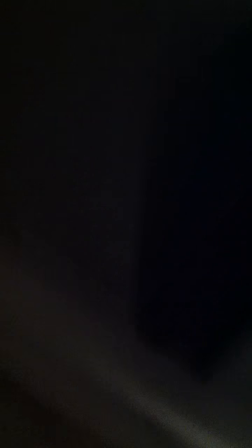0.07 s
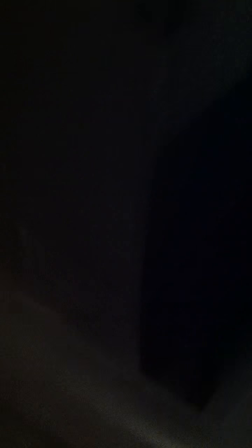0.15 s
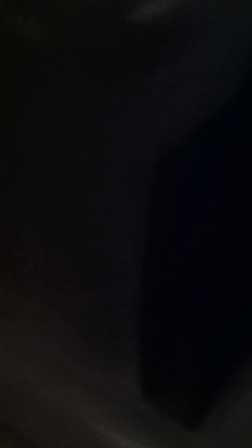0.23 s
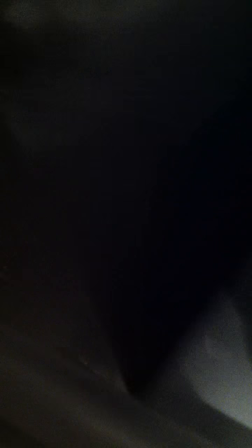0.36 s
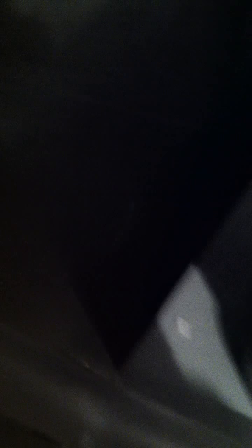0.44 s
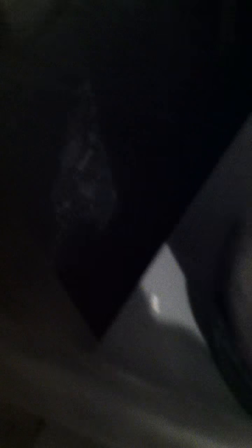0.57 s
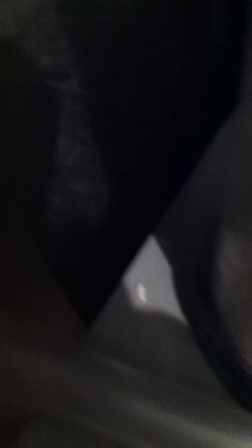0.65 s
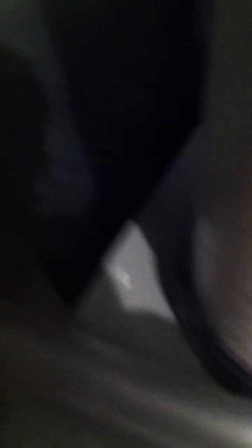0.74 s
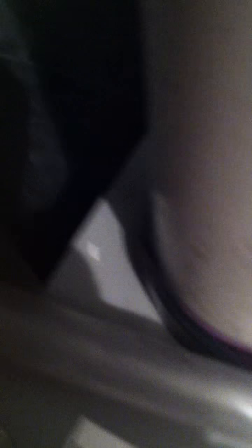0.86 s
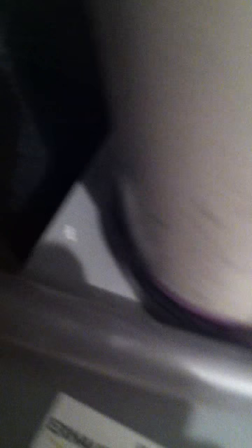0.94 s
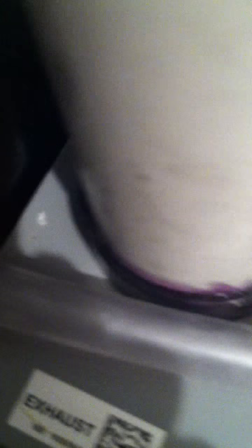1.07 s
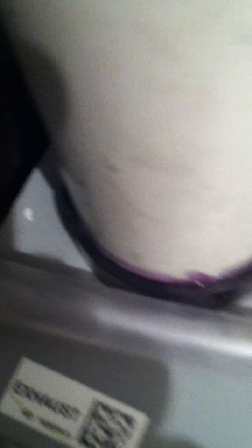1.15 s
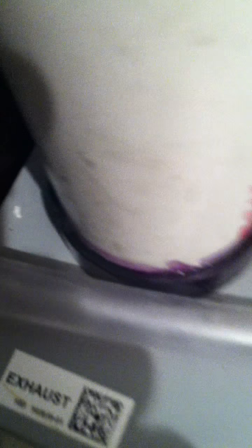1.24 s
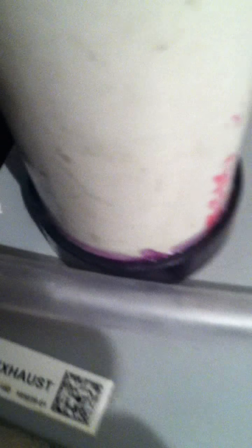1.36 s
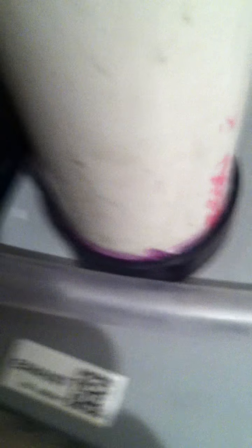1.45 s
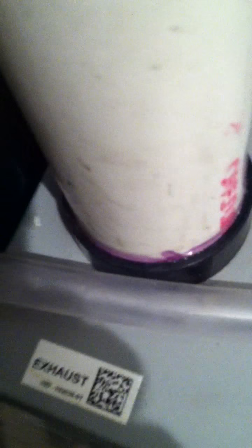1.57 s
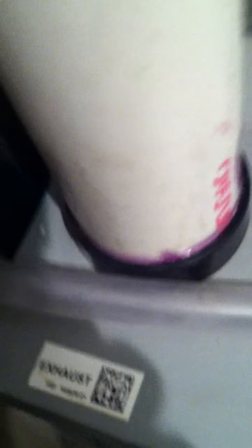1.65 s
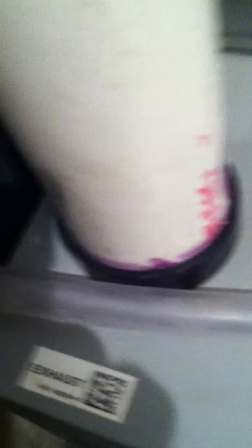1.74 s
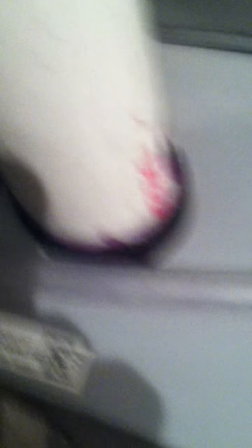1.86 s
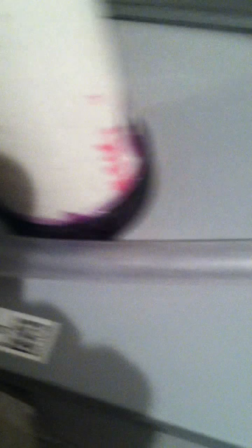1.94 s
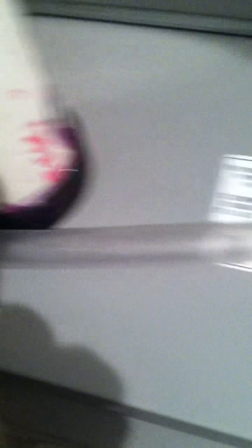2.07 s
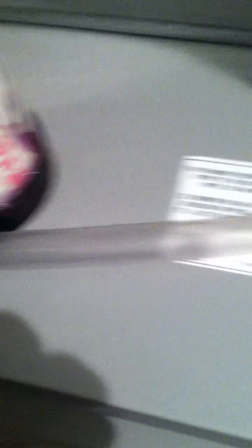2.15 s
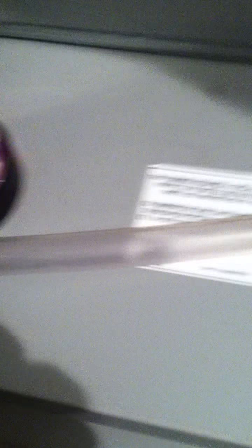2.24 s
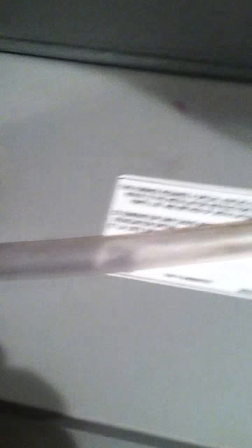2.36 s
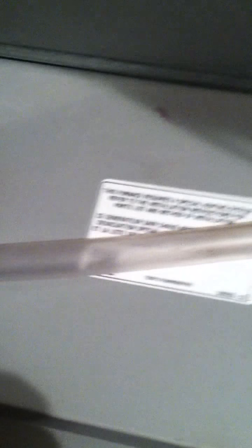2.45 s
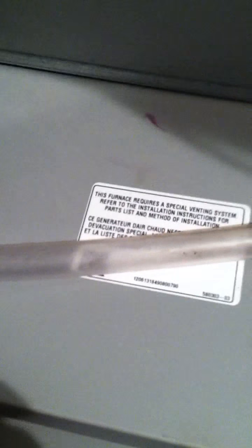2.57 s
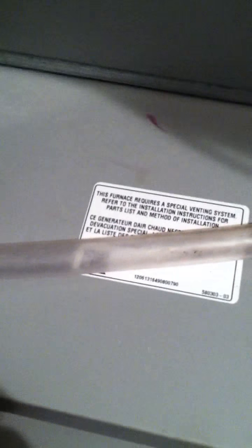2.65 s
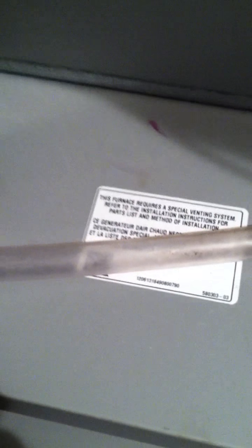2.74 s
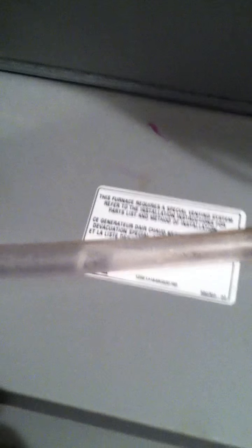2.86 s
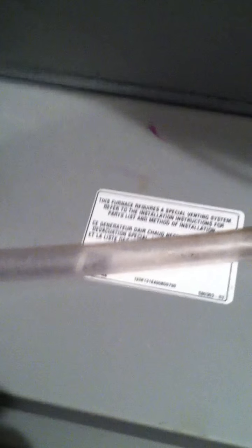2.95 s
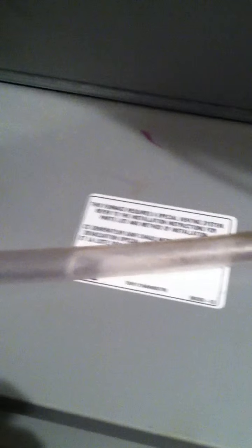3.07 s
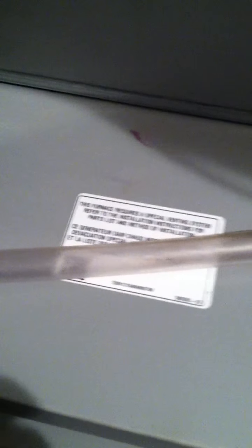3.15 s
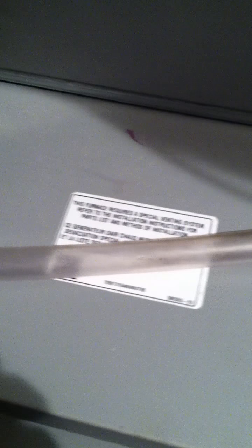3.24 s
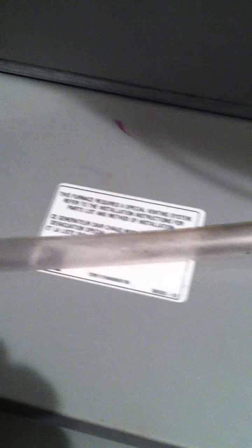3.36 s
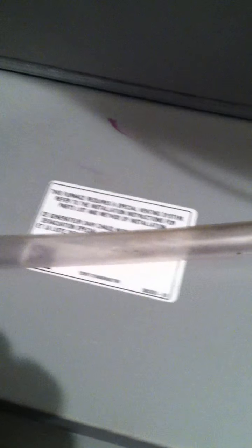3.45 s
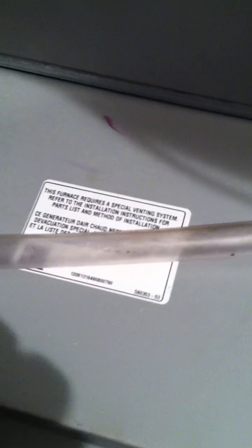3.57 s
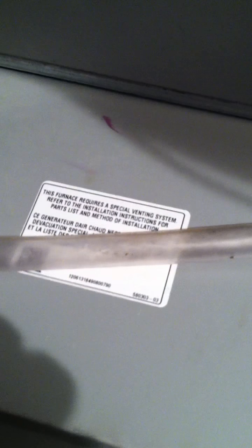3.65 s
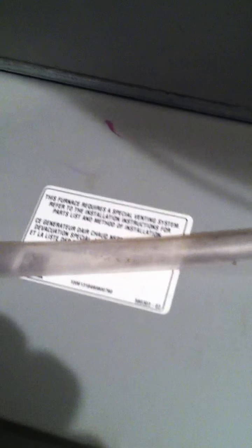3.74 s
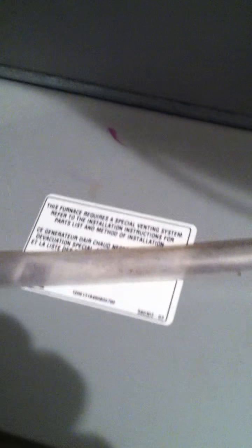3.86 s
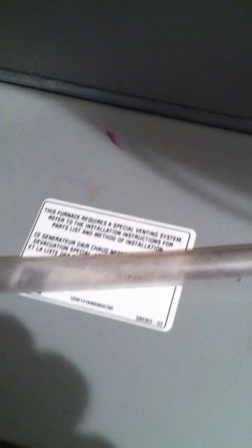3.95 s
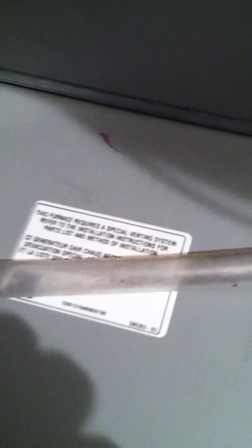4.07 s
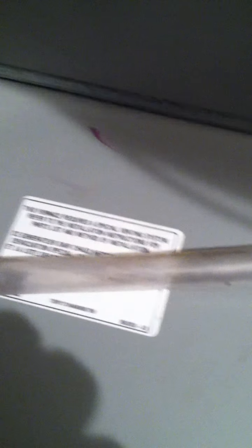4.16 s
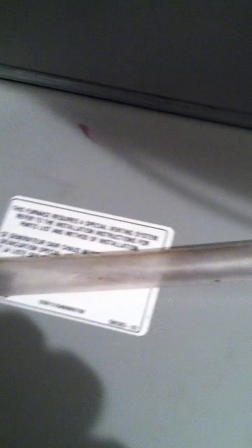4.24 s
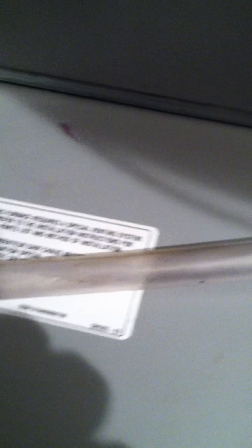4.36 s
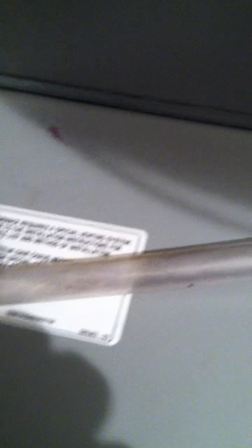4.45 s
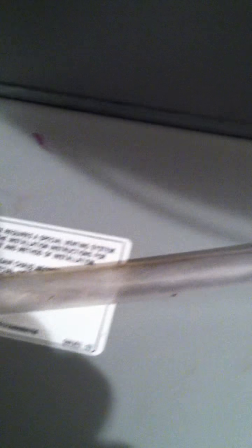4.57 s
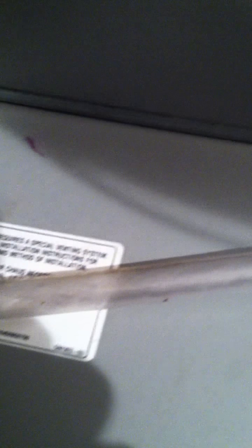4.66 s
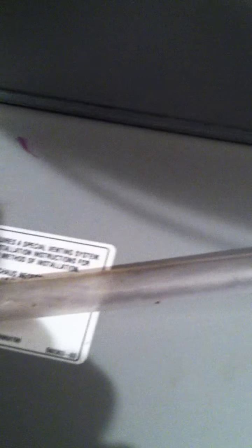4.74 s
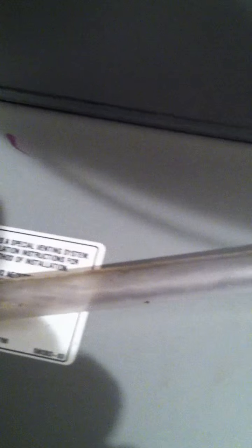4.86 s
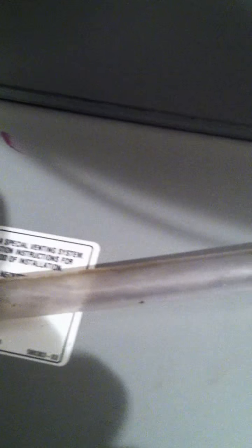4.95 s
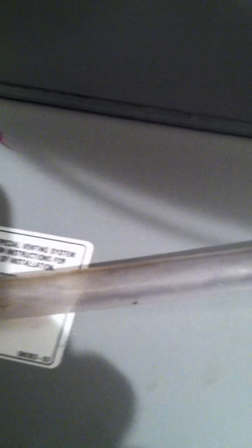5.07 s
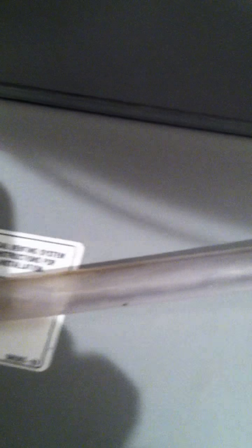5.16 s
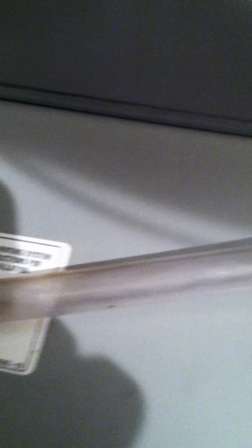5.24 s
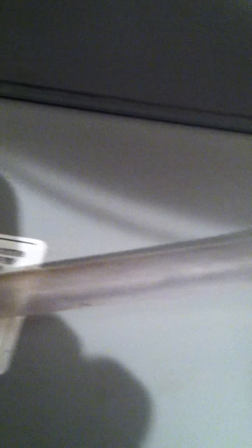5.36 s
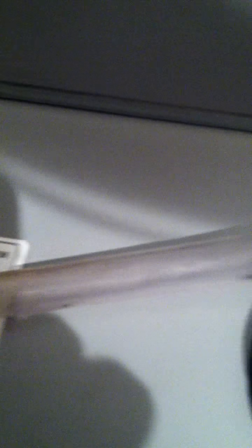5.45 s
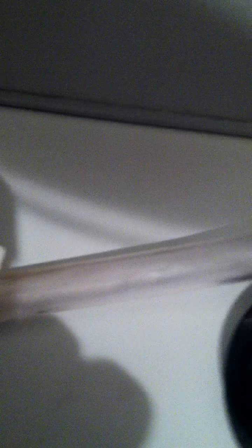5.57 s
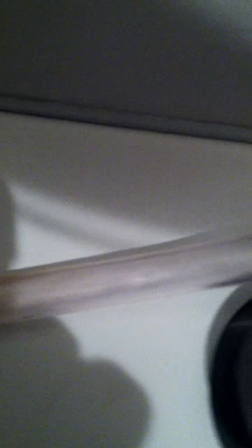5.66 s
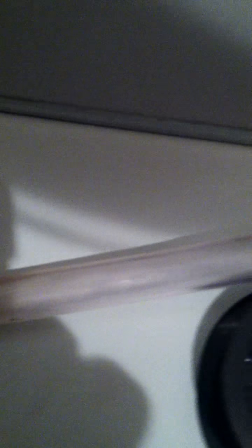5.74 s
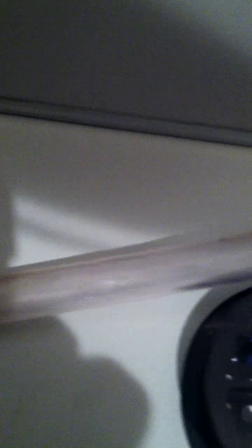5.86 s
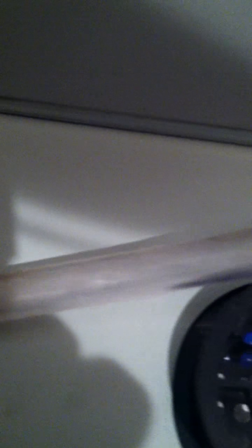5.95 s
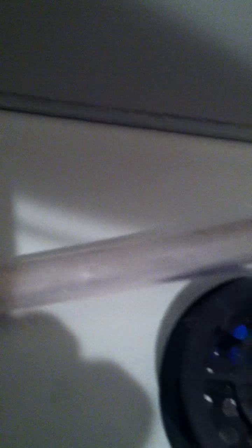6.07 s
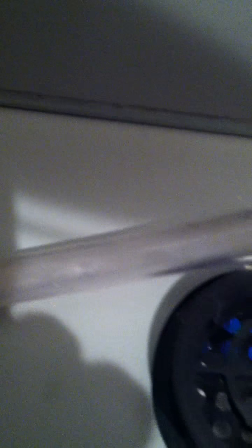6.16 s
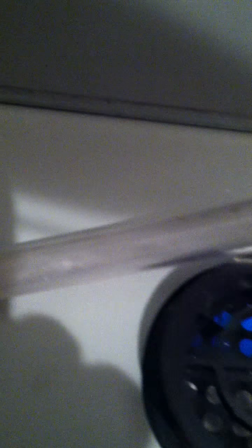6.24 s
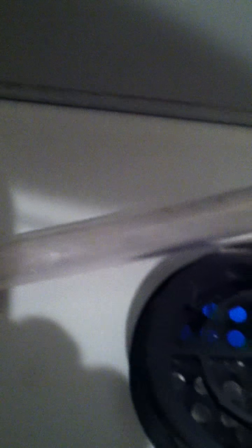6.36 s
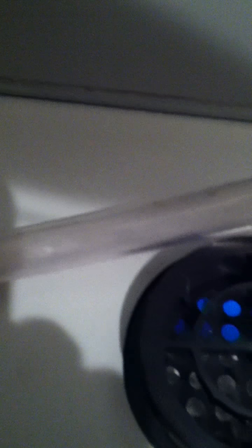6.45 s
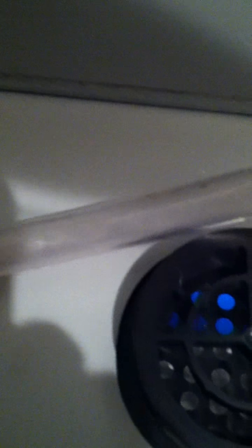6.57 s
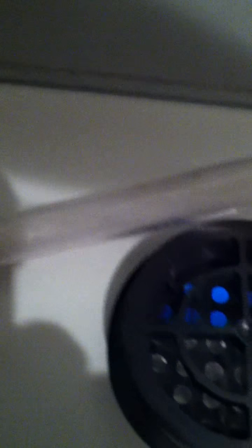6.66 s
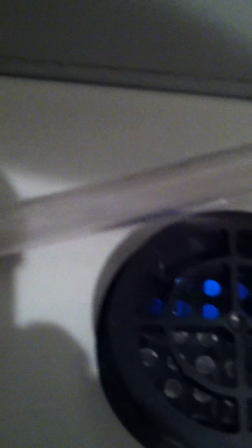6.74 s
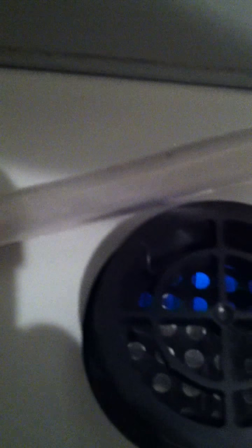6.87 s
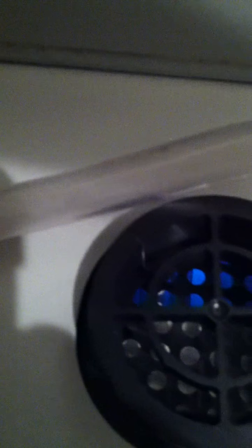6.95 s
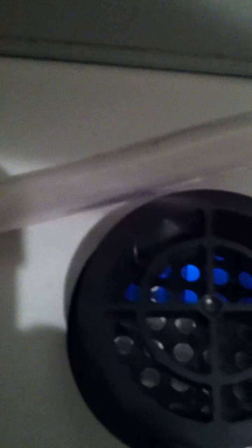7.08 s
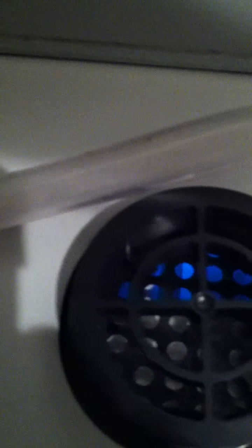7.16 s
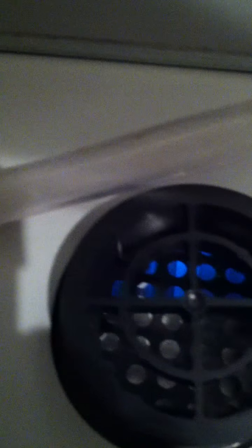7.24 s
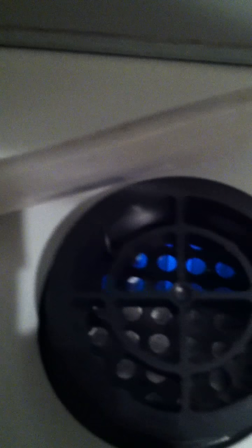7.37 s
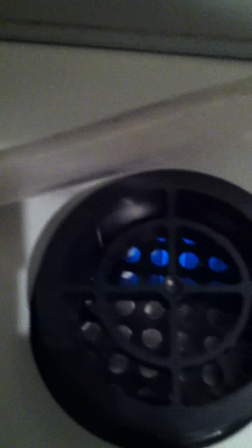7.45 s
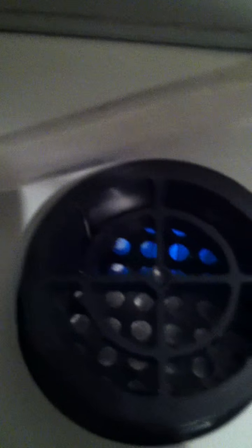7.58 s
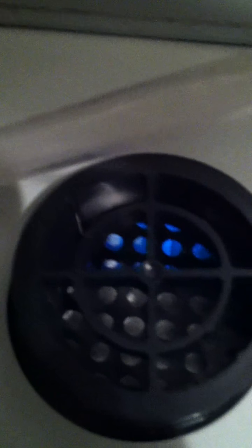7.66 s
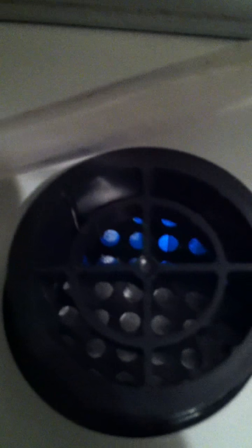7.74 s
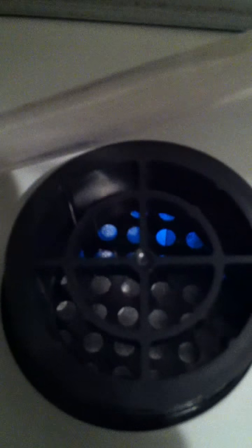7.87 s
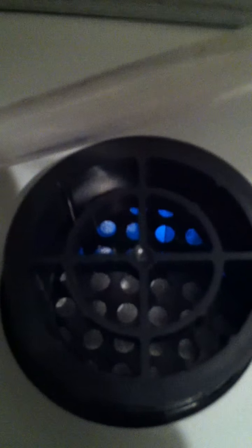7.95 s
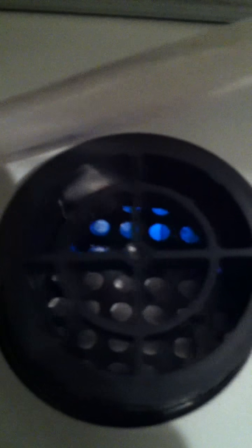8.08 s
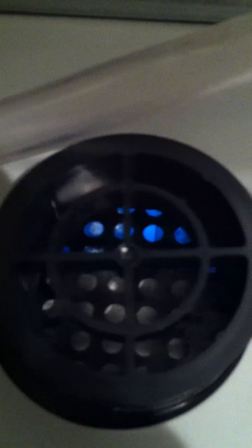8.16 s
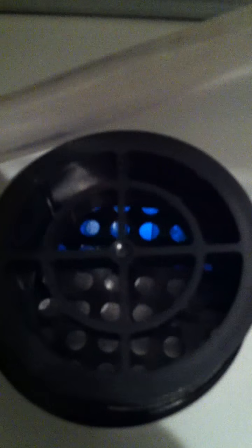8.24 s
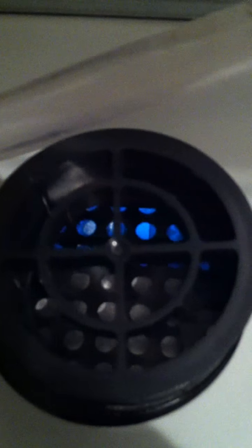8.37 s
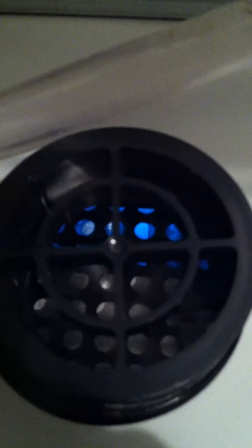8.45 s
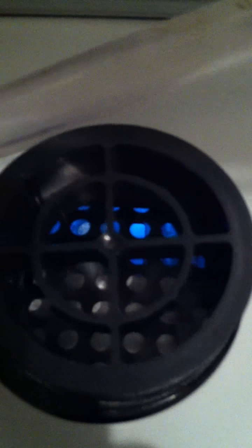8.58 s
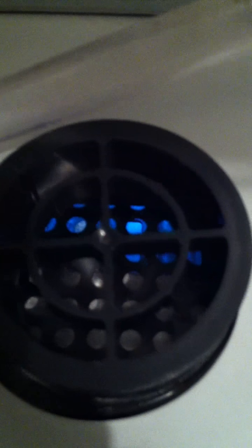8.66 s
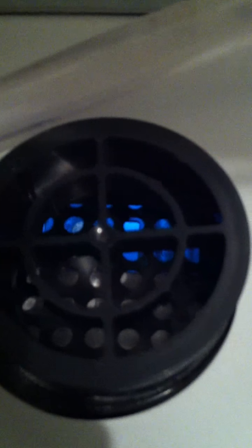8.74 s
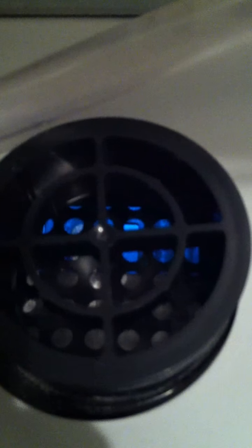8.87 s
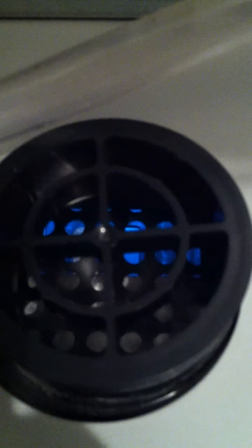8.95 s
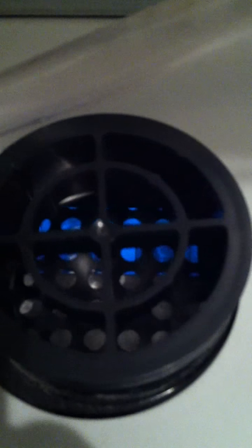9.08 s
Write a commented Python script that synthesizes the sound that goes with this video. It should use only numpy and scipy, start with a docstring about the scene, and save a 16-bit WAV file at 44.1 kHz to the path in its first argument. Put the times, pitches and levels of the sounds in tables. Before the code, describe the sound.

Close hand-held mono pickup of a running basement gas furnace: steady low humming, soft airy roar and a very faint thin blower whine. Fingers knock and scuff on the phone at about one and a half and two seconds. Afterwards only the machine remains, its upper hum swelling from the middle onward and staying strong to the end.

```python
"""A gas furnace runs in a basement, heard by a hand-held phone that starts near the exhaust pipe.
From the start the draft fan hums on two locked sine tones, over shaped noise for flame roar, duct rush
and air hiss, with the blower's faint whine of thin lines. In the first two seconds or so fingers tick
(short dying sines) and scuff (noise bursts) on the case. The phone crosses the cabinet top and ends
towards the air intake, where the upper fan tone swells."""
import sys
import numpy as np
from scipy import signal
from scipy.fft import rfft, irfft, next_fast_len
from scipy.io import wavfile
from scipy.ndimage import uniform_filter1d, map_coordinates

SR = 44100
rng = np.random.default_rng(int(sys.argv[2]) if len(sys.argv) > 2 else 0)


def to_wav(s):
    """Save 16-bit WAV."""
    ch = np.atleast_2d(s).T  # columns
    pcm = np.round(np.clip(ch, -1, 1) * 32767)  # PCM
    wavfile.write(sys.argv[1], SR, pcm.astype(np.int16))


N = 401751

# where the phone is: (time [s], place [0 pipe, 1 cabinet top, 2 intake])
PHONE_PLACE = [(1.6, 0.17), (2.6, 1.04), (5.2, 1), (6.4, 1.56)]
# mean levels at the phone: (time [s], upper tone [dB], lower tone [dB], air hiss [dB])
LEVELS_AT_PHONE = [(0, -14, -18.5, -37.5), (.8, -14, -18, -37.5), (1.3, -15.5, -19.5, -38),
                   (1.65, -17.5, -21.5, -39.5), (2.0, -15.5, -22, -38), (2.15, -19, -27.5, -41),
                   (2.4, -16, -25.5, -40.5), (3.2, -16, -24.5, -39), (3.75, -13.5, -22.5, -38),
                   (4.1, -14.5, -26.5, -38), (4.5, -11, -24, -37.5), (5.2, -10, -24.5, -36.5),
                   (5.8, -7.5, -21.5, -36), (7.0, -7.5, -24.5, -36.5), (7.35, -6.5, -22.5, -36),
                   (8.1, -7.5, -26, -37.5), (8.5, -6.5, -21, -37), (9.11, -8.5, -26, -38)]
# faint fan tones: (multiple of the blade tone, level against the upper tone [dB])
FAINT_TONES = [(3, -40.5), (4, -32.5)]
# flame roar at each place: (frequency [Hz], relative level per Hz [dB])
ROAR_PIPE = [(20, -50.5), (50, -43), (75, -18), (110, -6.5), (150, -3), (200, -5.5), (260, -3), (320, -3),
             (360, -4.5), (395, -12), (450, -11), (520, -37.5), (700, -120)]
ROAR_TOP = [(20, -50), (50, -40), (75, -24), (110, -5.5), (132, -6), (150, 1.5), (190, -7.5), (225, -6),
            (260, -12), (320, -4), (358, 1.5), (395, -9), (450, -19), (520, -40.5), (700, -120)]
ROAR_INTAKE = [(20, -51), (50, -40), (75, -20.5), (110, -8.5), (132, -7), (150, -1), (190, -9), (225, -8.5),
               (260, -12.5), (320, -3), (358, 1.5), (395, -12), (450, -14.5), (520, -40.5), (700, -120)]
# duct rush at each place: (frequency [Hz], relative level per Hz [dB])
RUSH_PIPE = [(250, -26.5), (420, -8.5), (443, 1.5), (647, -1.5), (700, 1), (939, -5.5), (1230, -4),
             (1500, -24.5), (1950, -45), (3300, -120)]
RUSH_TOP = [(250, -30), (420, 1.5), (445, -10), (475, 0), (517, -3.5), (697, -4.5), (1200, -11.5),
            (1500, -20), (1950, -49.5), (3300, -120)]
RUSH_INTAKE = [(250, -29.5), (420, -2), (607, -3), (697, -5.5), (723, -6), (1160, -13.5), (1360, -16.5),
               (1500, -20.5), (1950, -46.5), (3300, -120)]
# air hiss at each place: (frequency [Hz], relative level per Hz [dB])
HISS_PIPE = [(820, -20), (1400, -3.5), (1670, -8.5), (1920, -11), (2390, -13.5), (3190, -21), (3560, -18),
             (3930, -19), (5340, -17.5), (6850, -29.5), (9890, -36), (12300, -41.5), (15000, -58)]
HISS_TOP = [(820, -29), (1400, -4), (1520, -8.5), (1740, -3), (1980, -4.5), (2120, -1.5), (2860, -12.5),
            (3780, -11.5), (5560, -13), (6200, -18.5), (8610, -29.5), (11900, -38), (15000, -51)]
HISS_INTAKE = [(820, -38), (1400, -7), (1790, 2), (2210, -6.5), (2490, -4.5), (2720, -11), (2980, -9),
               (4700, -10), (5090, -10), (8190, -27.5), (9690, -32.5), (11400, -29.5), (15000, -55)]
# roar and rush at the pipe, top and intake: (level over the hiss [dB])
ROAR_OVER_HISS = [12.5, 14.5, 16]
RUSH_OVER_HISS = [8, 7.5, 8.5]
# blower whine, mean strength of its lines: (frequency [Hz], level against the hiss [dB])
WHINE_LINES = [(4560, -59.5), (4640, -28), (4780, -35), (4960, -28), (5150, -33), (5400, -28.5),
               (5480, -34), (5690, -35), (5722, -26), (5750, -33), (5800, -59.5)]
# finger ticks, levels before softening:
# (time [s], knock pitch [Hz], knock level [dB], click level [dB], step up per click mode [dB])
FINGER_TICKS = [(.1180, 900, -34, -38, 6), (.1290, 900, -32, -35, 7), (.3708, 900, -32, -31, 6.5),
                (1.1569, 1200, -27, -22, 1), (1.3687, 805, -4.5, -46, -3), (1.418, 1100, -26, -37, 3),
                (1.4467, 1000, -2, -4.5, 3), (1.9464, 1400, -18, -25, 0), (2.0195, 1200, -36, -33, 4),
                (2.029, 1200, -14, -28, -3), (2.0414, 1030, 3.5, -9, -0.5), (2.0623, 1210, -11, -34, -10),
                (2.0705, 1200, -5.5, -30, -5), (2.075, 650, -9, -40, -7.5), (2.0880, 1100, -11, -39, -9)]
# the case rings after a knock: (frequency [Hz], level against the knock [dB], time to fall 60 dB [s])
CASE_BODY = [(610, -9.5, 0.019), (1334, -23.5, 0.021)]
# small modes of the case: (frequency [Hz], time to fall 60 dB [s])
CASE_CLICKS = [(2100, 0.0023), (4900, 0.0018), (7800, 0.0014)]
# finger slides: (touch time [s], strongest time [s], lift time [s], mean level when strongest [dB])
FINGER_SLIDES = [(1.405, 1.415, 1.442, -40), (2.016, 2.036, 2.074, -27.5)]
# colour of skin scuffing on the case: (frequency [Hz], relative level per Hz [dB])
SKIN_COLOUR = [(250, -120), (450, -3), (1200, 3.5), (2200, -11), (3000, -16), (4500, -9), (7500, -16.5),
               (10000, -21.5), (13000, -35), (16000, -57.5)]


def amp(db):
    """Turn a level in dB into a gain."""
    return 10 ** (np.asarray(db) / 20)


def unit(x):
    """Scale x to an average strength (rms) of 1."""
    return x / np.sqrt(np.mean(x ** 2) + 1e-20)


def curves(rows):
    """Draw straight lines through the rows: one value per sample for each column after the time."""
    times, *columns = np.transpose(rows)
    return [np.interp(np.arange(N) / SR, times, column) for column in columns]


def along(points, hz):
    """Read a value at hz from (frequency [Hz], value) points on a log frequency axis."""
    f, values = np.transpose(points)
    return np.interp(np.log(hz + 1), np.log(f + 1), values)


def wobble(rate):
    """Make a smooth random curve with `rate` random points a second."""
    points = rng.standard_normal(int(N * rate / SR) + 4)
    return map_coordinates(points, [np.arange(N) * rate / SR])


def filtered(x, response):
    """Multiply the spectrum of x by a response that depends on frequency."""
    size = next_fast_len(N + 8192)  # spare room so the end does not wrap onto the start
    hz = np.fft.rfftfreq(size, 1 / SR)
    return irfft(rfft(x, size) * response(hz), size)[..., :N]


def noise(spectra, patchy_db):
    """Make noise with random stronger and weaker patches, coloured once per spectrum, each at rms 1."""
    grains = signal.stft(rng.standard_normal(N), nperseg=512)[2]
    patches = uniform_filter1d(rng.standard_normal(grains.shape), size=6, axis=0)  # across frequency
    patches = uniform_filter1d(patches, size=14, axis=1)  # across time
    patchy = signal.istft(grains * amp(patchy_db * unit(patches)), nperseg=512)[1][:N]
    coloured = filtered(patchy, lambda hz: amp([along(points, hz) for points in spectra]))
    return [unit(row) for row in coloured]


def heard(spectra, patchy_db):
    """Fade the colour of one noise from place to place as the phone moves."""
    place, = curves(PHONE_PLACE)
    out = np.zeros(N)
    for k, x in enumerate(noise(spectra, patchy_db)):
        nearness = np.clip(1 - np.abs(place - k), 0, 1)
        out += nearness * x
    return out


def by_place(values):
    """Fade between one value per place as the phone moves."""
    place, = curves(PHONE_PLACE)
    return np.interp(place, np.arange(len(values)), values)


def draft_fan(upper_db, lower_db):
    """Blade tones share one slightly drifting shaft; turbulence shakes their strength and phase."""
    blade_hz, shaft_hz = 172.05, 28.67  # mean rates
    turn = 2 * np.pi * np.cumsum(blade_hz + 0.11 * wobble(2.2)) / SR  # phase of the lower tone
    once = np.sin(turn * shaft_hz / blade_hz)  # an uneven wheel swells the tones once a turn
    upper_gain = amp(upper_db + 0.52 * wobble(14) + 0.18 * once)
    upper = upper_gain * np.cos(2 * turn + np.pi + 0.046 * wobble(15))
    lower_gain = amp(lower_db + 0.34 * wobble(11) + 2.0 * once)
    lower = lower_gain * np.cos(turn + 0.13 * wobble(11))
    faint = np.zeros(N)
    for multiple, db in FAINT_TONES:
        faint += amp(upper_db + db + 2.5 * wobble(4.5)) * np.cos(multiple * turn)
    return np.sqrt(2) * (upper + lower + faint)  # a steady sine needs a peak of root 2 for rms 1


def flame_roar(roar_db, flow):
    """The flame roars as low noise that swells a little with the flow."""
    return amp(roar_db + 0.46 * flow) * heard([ROAR_PIPE, ROAR_TOP, ROAR_INTAKE], patchy_db=1.0)


def duct_rush(rush_db, flow):
    """Air rushes as middle-pitched noise, swelling with the flow and a little by itself."""
    gain = amp(rush_db + 0.3 * flow + 0.23 * wobble(6.0))
    return gain * heard([RUSH_PIPE, RUSH_TOP, RUSH_INTAKE], patchy_db=0.64)


def air_hiss():
    """Moving air hisses as higher noise whose colour depends on the place."""
    return heard([HISS_PIPE, HISS_TOP, HISS_INTAKE], patchy_db=0.72)


def blower_whine():
    """A fine roughness of the bearing repeats every turn, which makes a comb of thin lines."""
    blower_hz = 19.937  # mean turns per second
    size = 2 ** 15  # points in one turn
    hz = np.arange(size // 2 + 1) * blower_hz
    in_band = (hz > WHINE_LINES[0][0]) * (hz < WHINE_LINES[-1][0])
    lines = amp(along(WHINE_LINES, hz) + rng.normal(0, 1.6, len(hz))) * in_band
    random_phase = np.exp(2j * np.pi * rng.random(len(hz)))
    pattern = irfft(lines * random_phase) * size / np.sqrt(2)
    turns = np.cumsum(blower_hz + 0.006 * wobble(2.5)) / SR
    return np.interp(turns % 1 * size, np.arange(size), pattern)


def air(roar_db, rush_db, hiss_db):
    """Flame roar, duct rush, hiss and whine swell a little together with the flow."""
    flow = wobble(4.0)
    hiss_and_whine = amp(hiss_db + 0.3 * flow) * (air_hiss() + blower_whine())
    return flame_roar(roar_db, flow) + duct_rush(rush_db, flow) + hiss_and_whine


def ring(t, hz, db, t60):
    """A struck mode is a sine that dies away, falling 60 dB in t60 seconds."""
    return amp(db - 60 * t / t60) * np.sin(2 * np.pi * hz * t)


def finger_ticks():
    """Each tick is a dull knock of the case plus its three short click modes."""
    knock_t60, knock_rise_s = 0.0058, 0.00042  # fall by 60 dB and time constant of the soft landing, s
    thin_hz, soft_hz = 250, 12500  # the small case gives no bass; fingertips are soft
    middle_db = 3.5  # the middle click mode stands out
    out = np.zeros(N)
    t = np.arange(SR // 25) / SR
    landing = 1 - np.exp(-t / knock_rise_s)
    for start, knock_hz, knock_db, click_db, bright_db in FINGER_TICKS:
        knock = ring(t, knock_hz, knock_db, knock_t60)
        for hz, db, t60 in CASE_BODY:
            knock += ring(t, hz, knock_db + db, t60)
        mode_db = [click_db - bright_db, click_db + middle_db, click_db + bright_db]
        clicks = np.zeros(len(t))
        for k, (hz, t60) in enumerate(CASE_CLICKS):
            # neighbours swing in opposite senses, so the band between them stays filled
            clicks += (-1) ** k * ring(t, hz, mode_db[k], t60)
        out[round(start * SR):][:len(t)] += knock * landing - clicks
    return filtered(out, lambda hz: 1j * hz / (thin_hz + 1j * hz) / (1 + (hz / soft_hz) ** 6))


def finger_slides():
    """Skin scuffs on the case: noise swells to its strongest moment, fades, and starts and stops fast."""
    swell, fade, edge = 400, 270, 2200  # slopes, dB per second
    t = np.arange(N) / SR
    levels = []
    for touch, top, lift, db in FINGER_SLIDES:
        before_top = np.clip(top - t, 0, None)
        after_top = np.clip(t - top, 0, None)
        off_case = np.clip(np.maximum(touch - t, t - lift), 0, None)
        levels.append(db - swell * before_top - fade * after_top - edge * off_case)
    level_db = np.max(levels, axis=0)
    return amp(level_db + 3.5 * wobble(300)) * noise([SKIN_COLOUR], patchy_db=1.5)[0]


def scene():
    """The furnace and the fingers add up at one microphone."""
    upper_db, lower_db, hiss_db = curves(LEVELS_AT_PHONE)
    roar_growth = 0.3  # extra dB of roar for each dB that the hiss rises over its mean
    roar_db = hiss_db + by_place(ROAR_OVER_HISS) + roar_growth * (hiss_db - hiss_db.mean())
    rush_db = hiss_db + by_place(RUSH_OVER_HISS)
    tones = draft_fan(upper_db, lower_db + 0.9 * wobble(3.2))  # the lower tone wavers
    return (tones + air(roar_db, rush_db, hiss_db) + finger_ticks() + finger_slides())[None]


def record(dry):
    """The highest peaks round off; the input stage loses deep bass and top treble, up to a band limit."""
    top_hz = 15500  # nothing is kept above this
    soft = dry / (1 + np.abs(dry / 1.04) ** 8) ** (1 / 8)

    def response(hz):
        bass_loss = 1 + (45 / (hz + 1)) ** 4
        treble_loss = 1 + (hz / 13300) ** 10
        return np.clip((top_hz - hz) / 600, 0, 1) / np.sqrt(bass_loss * treble_loss)

    return filtered(soft, response)


dry = scene()
out = record(dry)
to_wav(out)
```